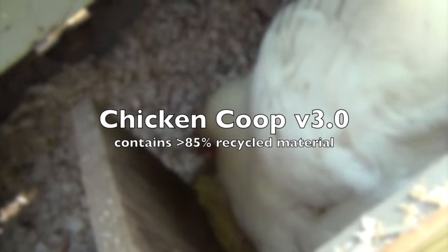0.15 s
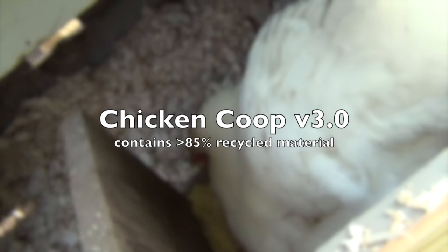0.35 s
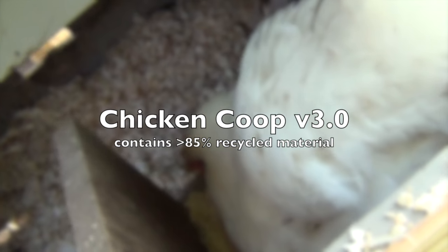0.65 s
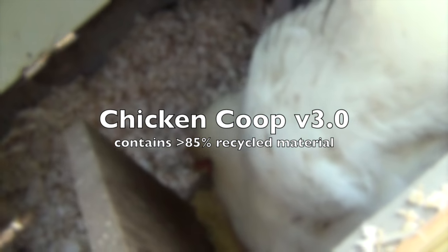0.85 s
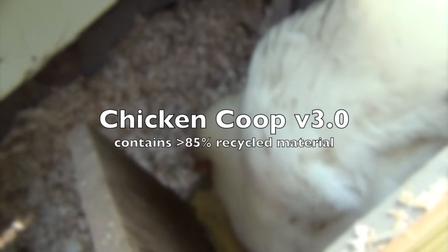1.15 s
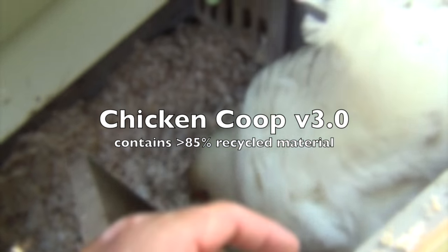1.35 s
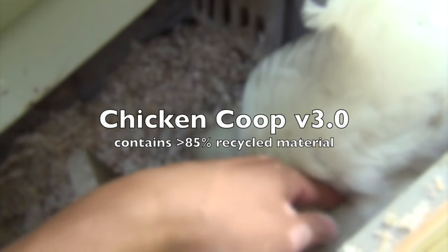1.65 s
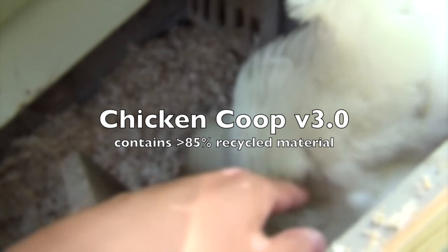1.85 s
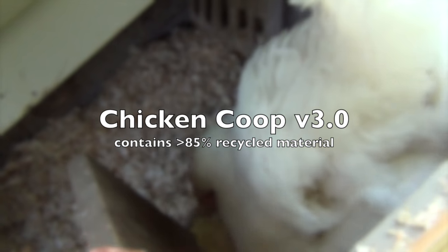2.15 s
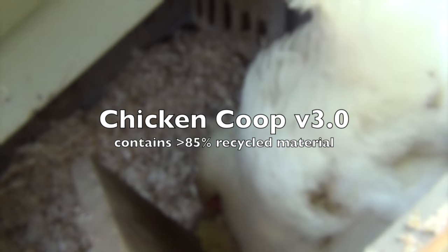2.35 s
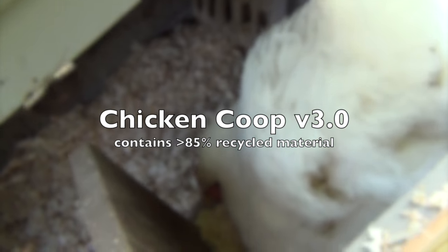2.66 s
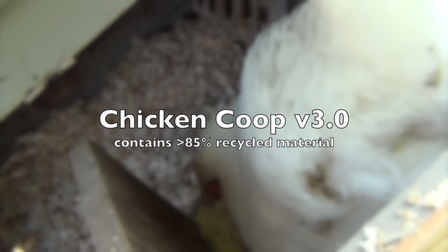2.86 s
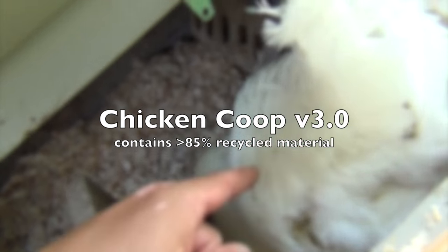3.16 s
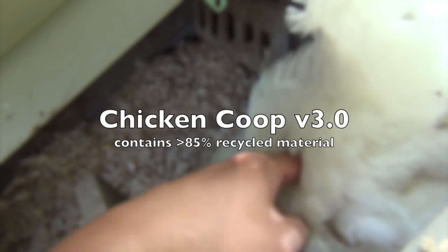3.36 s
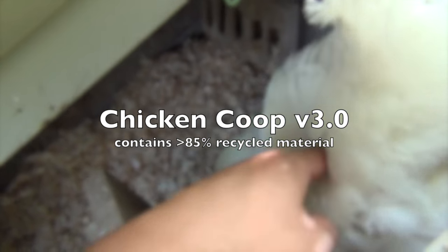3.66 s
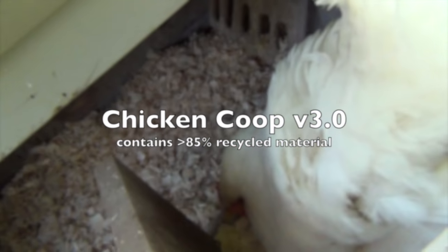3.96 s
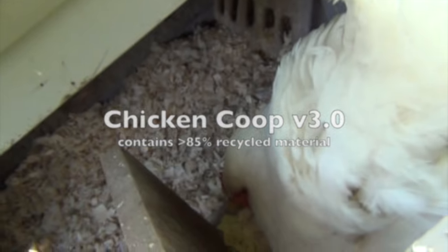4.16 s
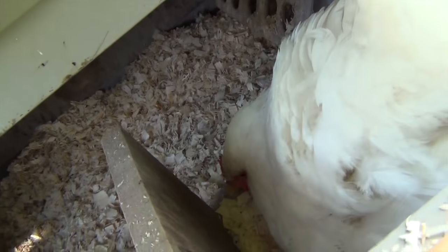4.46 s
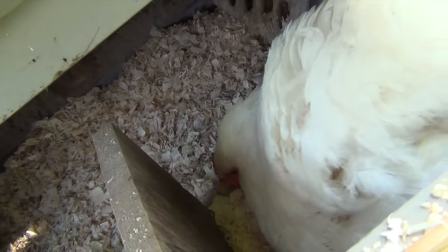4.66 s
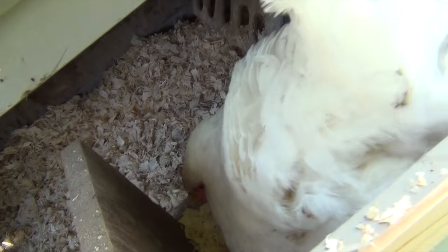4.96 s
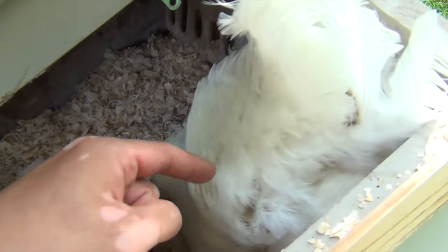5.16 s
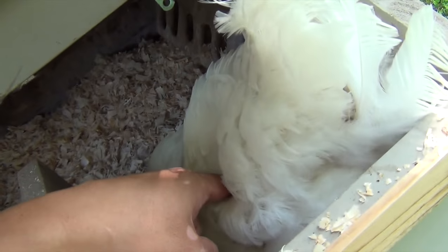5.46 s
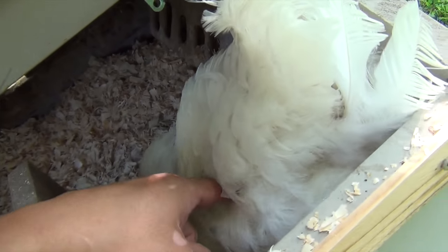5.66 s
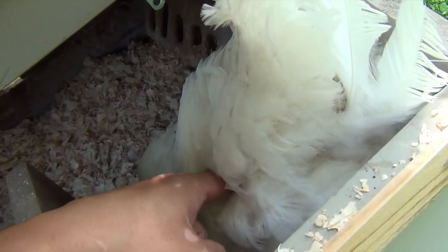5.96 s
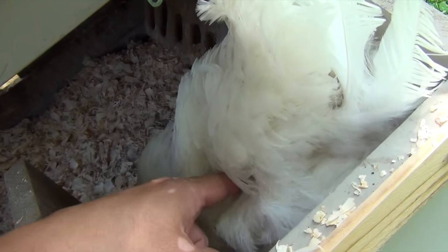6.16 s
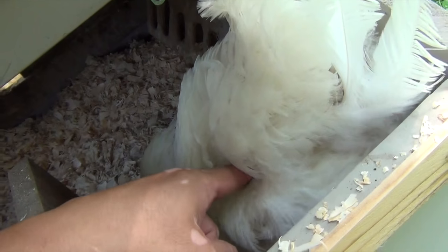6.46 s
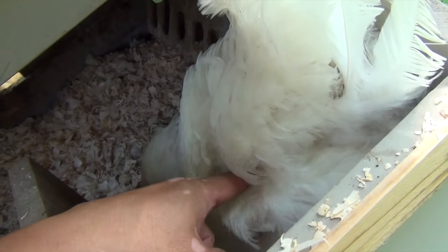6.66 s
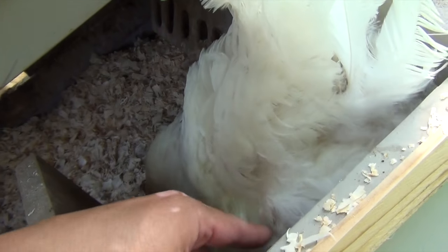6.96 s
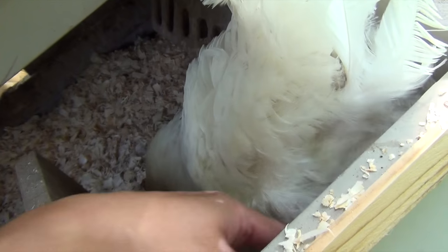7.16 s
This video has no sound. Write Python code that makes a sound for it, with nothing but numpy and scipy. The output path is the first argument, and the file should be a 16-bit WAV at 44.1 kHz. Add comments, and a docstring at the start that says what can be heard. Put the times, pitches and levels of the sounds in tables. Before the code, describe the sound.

Close low hen clucks and wooden knocks, broken by three rough fluttering squawks that sink in pitch, with small birds chirping far off outdoors.

```python
"""A wooden nesting box in a coop, outdoors and quiet: soft air, a low hum and a thin electronic whine throughout.
A sharp knock on the boards opens it, and a hen close to the microphone begins to cluck: syrinx pops and pulses.
Poked by a hand, she gives three harsh protests, at about 1.7, 3.5 and 5.6 s: fluttering, then rough and sinking.
More knocks, bursts of noise rung by wood, fall until about 5 s; far songbirds, gliding pure tones, sing between.
The clucks return after each protest and last to the end, over small ticks of beak and bedding."""
import sys
import numpy as np
from scipy import signal
from scipy.fft import rfft, irfft
from scipy.io import wavfile
from scipy.ndimage import uniform_filter1d

SR = 44100
rng = np.random.default_rng(int(sys.argv[2]) if len(sys.argv) > 2 else 0)


def file_out(sig):
    """Save sig as 16-bit WAV at sys.argv[1]."""
    # one column per channel
    cols = np.atleast_2d(sig).T
    # limit, then scale
    lim = np.clip(cols, -1, 1)
    pcm = np.round(lim * 32767).astype(np.int16)
    wavfile.write(sys.argv[1], SR, pcm)


N = 321841  # samples

# Spectrum of the outdoor air: pitch_hz [Hz], level_db [relative dB, per Hz]
AIR_SPECTRUM = [(15, -20), (25, -30.5), (179, 4), (368, -4), (644, -2.5), (735, -3), (840, -8.5), (959, -3),
                (1190, -2.5), (1920, -10), (3260, -12), (4040, -14), (4620, -12.5), (5860, -15),
                (14500, -25.5)]
AIR_DB, AIR_SWELL_DB = -58.5, 0.46  # mean level; rms of its slow swell
# Likeness of the air in the left and right channels: pitch_hz [Hz], likeness [correlation]
AIR_LIKENESS = [(60, 0.92), (150, 0.98), (380, 0.25), (950, 0.85), (2380, 0.086), (5980, 0.052),
                (15000, 0.79)]
# Low hum and electronic whine: pitch_hz [Hz], level_db [dB rms], width_hz [Hz, at half amplitude]
HUMS = [(60, -76, 3), (129, -91, 7.4), (15735, -70.5, 4), (15690, -75, 200)]

# Songbird whistles: start_s [s], length_s [s], first_hz [Hz], last_hz [Hz], level_db [dB peak, before wavering]
WHISTLES = [(.06, .05, 2290, 1820, -45), (1.215, .033, 4100, 3680, -66), (1.341, .11, 7720, 7210, -50.5),
            (1.382, .072, 4180, 3730, -62), (1.402, .037, 6200, 5330, -58.5),
            (1.599, .05, 4080, 3530, -60.5), (2.949, .06, 3400, 3230, -57.5), (2.976, .08, 2840, 2715, -52),
            (4.408, .043, 1867, 2510, -47), (4.476, .041, 3120, 3260, -59),
            (4.629, .058, 4500, 4520, -54.5), (4.748, .08, 4450, 4550, -57), (4.76, .028, 3080, 2920, -50),
            (4.823, .029, 1880, 2440, -48.5), (4.871, .057, 3346, 3190, -50),
            (4.957, 0.14, 3660, 3440, -62), (5.023, .094, 7750, 7460, -57), (5.053, .3, 3420, 3880, -65.5),
            (5.297, .36, 4160, 3840, -65.5), (5.335, .024, 3120, 2890, -53), (6.423, .036, 1950, 1614, -50)]
# Songbird warbles: start_s [s], length_s [s], pitch_hz [Hz], level_db [dB peak, before wavering],
# flick_height [share of pitch]
WARBLES = [(2.566, 0.19, 2360, -56.5, .19), (2.703, .18, 2570, -55.5, .18), (6.293, .056, 2290, -44, .34),
           (6.461, 0.089, 2408, -38.5, .5)]
WHISTLE_WAVER = 0.017  # rms share of pitch, whistles and warbles alike
FLICKS_PER_S, FLICK_SHARPNESS, FIRST_FLICK_S, WARBLE_DROOP = 52, 2.7, .022, 0.15  # droop: share of pitch

# Knocks on wood: start_s [s], crack_db [relative dB], ring_db [relative dB], rise_s [s],
# brightness [dB per octave], graze_db [dB against the blow]
KNOCKS = [(0.0238, -22.5, -16.5, 0.00033, 2.5, -9), (0.7289, -44, -34, .0006, -2.5, -22.5),
          (0.7559, -17, -24.5, 0.000076, -1, -12.5), (1.9174, -13.5, -19, .0002, 1, -36),
          (2.3382, -19.5, -28, .0002, -5, -30), (2.343, -29, -20.5, .0016, 5.5, -25),
          (3.348, -31.5, -20.5, 0.0075, 3, -5.5), (4.6126, -18.5, -20, 0.00053, 2.5, -28.5),
          (4.93, -33, -23, .012, 3, -14)]
# Spectrum of the first crack: pitch_hz [Hz], level_db [relative dB]
CRACK_SPECTRUM = [(80, -21), (400, 6), (900, 2.5), (1500, 4), (2400, 4.5), (3600, 0), (4800, -13),
                  (7000, -20), (9500, -41.5), (12000, -50.5), (16000, -59)]
# Spectrum of the ringing boards: pitch_hz [Hz], level_db [relative dB]
BOARD_SPECTRUM = [(50, -28.5), (130, 1.5), (250, -4), (420, 11), (650, 6.5), (1000, 2.5), (1600, -4.5),
                  (2800, -18), (4500, -23.5), (7000, -24), (10000, -38), (15000, -56)]
# Time for the boards to die by 60 dB: pitch_hz [Hz], t60_s [s]
BOARD_T60 = [(150, 0.37), (500, 0.17), (1200, 0.15), (3000, 0.16), (9000, 0.084)]
GRAZE_S = .0062  # the graze comes this long before the blow

# Time for the coop's reflections to die by 60 dB: pitch_hz [Hz], t60_s [s]
COOP_T60 = [(150, 0.88), (500, 0.08), (1000, 0.27), (3000, 0.4), (8000, 0.25)]
BOX_HZ, BOX_T60_S, BOX_DB = 666, .16, -12  # the hollow of the nesting box rings
HEN_GAINS_DB = [[1.25], [-1.4]]  # left and right: the hen and the reflections are a little louder on the left

# Clicks of beak and bedding: start_s [s], level_db [dB peak, before HEN_GAINS_DB], pitch_hz [Hz], width_hz [Hz]
TICKS = [(3.1335, -24.5, 5240, 1060), (3.1327, -37, 9600, 1500), (5.334, -27.5, 862, 278),
         (5.5537, -19, 831, 330), (6.123, -45, 7260, 1990)]

# Clucks, a pop, a weak hum and a creaky body: start_s [s], pop_db [dB, before HEN_GAINS_DB], body_delay_s [s],
# body_length_s [s], body_db [dB, before HEN_GAINS_DB], body_hz [Hz, where the body starts], edge_db [dB]
CLUCKS = [(0.1264, -22.5, .025, 0.012, -17, 247, -4.5), (0.5187, -18.5, 0.02, .012, -15.5, 308, -13),
          (0.92, -17.5, .013, 0.014, -18, 242.8, -17), (1.2979, -15.5, .016, 0.009, -17, 274, -16),
          (1.6283, -18.5, .02, 0.015, -12, 375.6, 5), (2.312, -19.5, 0.015, .014, -19, 294, 1),
          (2.7183, -18, 0.012, 0.0086, -16, 291, -4.5), (3.1333, -13, 0.017, 0.01, -18, 287, -1.5),
          (3.4282, -14.5, 0.016, .019, -16, 380.3, 5.5), (4.1041, -19.5, 0.017, 0.012, -13, 308.5, 2),
          (4.5786, -15, .016, 0.013, -17, 299, -1), (5.0102, -16.5, 0.011, 0.0127, -17, 334.6, 0),
          (5.2688, -13.5, .01, .015, -18.5, 285, 7.5), (6.1955, -15, .017, 0.011, -11.5, 307.3, 5.5),
          (6.5665, -13.5, 0.016, .011, -13.5, 275, 3.5), (6.965, -10.5, 0.014, 0.0097, -13, 347.4, 4.5),
          (7.2834, -16.5, 0.0052, 0.021, -6, 373, 8)]
# Windpipe with the beak nearly shut, for a cluck: pitch_hz [Hz], level_db [relative dB]
BEAK_SHUT = [(60, -42), (175, -14), (290, -12), (450, -5), (600, 1), (800, 3), (1080, -4), (1480, -24.5),
             (1780, -31.5), (2080, -29), (2600, -60), (3650, -60), (4250, -45.5), (4700, -55),
             (5250, -43.5), (5800, -68.5), (11000, -80.5)]
# Every pop has POP_HZ; a body at BODY_HZ falls by the share BODY_SAG, a lower one by more
POP_HZ, BODY_HZ, BODY_SAG = 415, 305, .17

# Protest calls: start_s [s], length_s [s], flutter_start_s [s], flutter_length_s [s], flutter_hz [Hz],
# opening_db, full_db, closing_db [dB, effort], edge_db [relative dB above 1.4 kHz, before a common 3.5 dB cut],
# three upper_db [relative dB of each upper resonance at the end of the call]
PROTESTS = [(1.715, 0.36, 1.729, 0.12, 570, -22, -14.5, -17.5, -15.5, -46.5, -41.5, -63),
            (3.498, 0.34, 3.544, .08, 490, -21.5, -13.5, -14, -16, -48.5, -42.5, -33.5),
            (5.574, .372, 5.623, .07, 611, -19.5, -14.5, -14.5, -19, -55, -58.5, -36)]
# Windpipe with the beak open, for a protest: pitch_hz [Hz], level_db [relative dB]
BEAK_OPEN = [(70, -44.5), (190, -20.5), (330, -15), (470, -5.5), (585, -7), (815, 1), (1130, -8.5),
             (1430, -24), (1800, -29.5), (2080, -32.5), (2500, -58.5), (3600, -59), (4300, -57.5),
             (6000, -67.5), (11000, -69.5)]
# Upper resonances, growing as the beak opens: pitch_hz [Hz], width_hz [Hz], rise_db [dB through the call]
UPPER_RESONANCES = [(2880, 170, 11.5), (4270, 280, 26.5), (5153, 270, 14)]
PROTEST_HZ, SINK, SINK_CURVE = 487, .38, 3.1  # loses this share of pitch, ever faster, as the air runs out
FLUTTERS_PER_S, FLUTTER_JITTER, FLUTTER_OCTAVES = 62, .06, 1.05
FLUTTER_IN_S, FLUTTER_OUT_S = .015, .045
TREMBLE_OCTAVES, FLUTTER_UNEVEN = .13, .18  # a trace of flutter stays to the end; its depth varies
ATTACK_S, FULL_AT, CLOSE_S = .008, 0.56, 0.05  # full effort comes at this share of the call
ROUGH_START, ROUGH_SETTLED, SETTLE_S = .52, .32, .06
EDGE_RISE_DB, UPPER_CHOKE_DB = 9, -5  # the edge grows; fluttering dulls the upper resonances
UPPER_FLICKER_DB, UPPER_FLICKER_HZ = 3.5, 45  # each upper resonance flares and fades on its own

EDGE_HZ = 16000  # upper band limit of the recorder


def gain_of(db):
    """Decibels to gain."""
    return 10 ** (np.asarray(db) / 20)


def evened(x):
    """Scales to rms 1."""
    return x / np.sqrt(np.mean(x ** 2) + 1e-20)


def ramp(x):
    """Rises from 0 to 1 and stays there."""
    return np.clip(x, 0, 1)


def read(points, hz):
    """Reads a table on a log-frequency axis."""
    f, value = np.transpose(points)
    return np.interp(np.log(hz + 1), np.log(f + 1), value)


def bell(f, centre_hz, width_hz):
    """Resonance curve in dB, 12 dB down at width_hz from its centre."""
    return -40 * np.log10(1 + ((f - centre_hz) / width_hz) ** 2)


def add(mix, s, sound):
    """Mixes a sound in at time s."""
    part = mix[..., max(round(s * SR), 0):][..., :sound.shape[-1]]
    part += sound[..., :part.shape[-1]]


def track(sounds, channels=1):
    """Lays timed sounds on one track."""
    out = np.zeros((channels, N))
    for s, sound in sounds:
        add(out, s, sound)
    return out


def wander(n, hz):
    """Random motion of rms about 1, with little faster than hz."""
    size = n + SR // 8
    f = np.fft.rfftfreq(size, 1 / SR)
    slow = rfft(rng.standard_normal(size)) / np.sqrt(1 + (f / hz) ** 8)
    return evened(irfft(slow))[:n]


def colour(x, curve_db):
    """Causal minimum-phase filter with the gain curve_db(Hz); the result has room to ring out."""
    size = 2048
    log_gain = np.log(gain_of(curve_db(abs(np.fft.fftfreq(size, 1 / SR)))))
    ring = np.fft.ifft(np.exp(np.conj(signal.hilbert(log_gain)))).real[:size // 2]
    return signal.fftconvolve(x, ring * np.hanning(size)[size // 2:])


def swing(x, size):
    """Running rms over about size samples."""
    power = uniform_filter1d(uniform_filter1d(x ** 2, size), size)
    return np.sqrt(abs(power) + 1e-12)


def dying(t60, length):
    """Two channels of dense reflections, each band dying at its own speed."""
    hz, t, z = signal.stft(rng.standard_normal((2, int(length * SR))), SR, nperseg=128)
    decay = gain_of(-60 * t / read(t60, hz)[:, None])
    tail = signal.istft(z * decay, SR, nperseg=128)[1]
    return tail / np.linalg.norm(tail, axis=1, keepdims=True)


def echo(x, t60, wet_db, delay, spread):
    """Reflections that arrive after a delay, partly unlike in the two channels."""
    mid, side = dying(t60, 0.19)
    tail = np.array([mid + spread * side, mid - spread * side])
    return track([(delay, gain_of(wet_db) * signal.fftconvolve(x, tail, axes=1))], channels=2)


def air():
    """Outdoor wash of shaped noise that swells a little, with narrow noise bands for the hum and whine."""
    f = np.fft.rfftfreq(N, 1 / SR)
    a, b, c = rfft(rng.standard_normal((3, N)))
    same = np.clip(read(AIR_LIKENESS, f), -1, 1)
    mid, side = a * np.sqrt(1 + same), b * np.sqrt(1 - same)
    wash = irfft(np.array([mid + side, mid - side]) * gain_of(read(AIR_SPECTRUM, f)), N)
    hum = 0
    for hz, db, width in HUMS:
        band = c / (1 + (2 * (f - hz) / width) ** 2)
        hum = hum + gain_of(db) * evened(irfft(band, N))
    return gain_of(AIR_DB + AIR_SWELL_DB * wander(N, 1.0)) * evened(wash) + hum


def note(hz, db):
    """A bird's pure tone along a pitch curve, wavering a little in pitch and level."""
    n = len(hz)
    turns = np.cumsum(hz * (1 + WHISTLE_WAVER * wander(n, 120))) / SR
    return gain_of(db + 2 * wander(n, 40)) * np.sin(2 * np.pi * turns) * signal.windows.tukey(n, .5)


def whistle(row):
    """A far bird's voice glides once from one pitch to another."""
    s, length, first_hz, last_hz, db = row
    return s, note(np.geomspace(first_hz, last_hz, int(length * SR)), db)


def warble(row):
    """The pitch flicks up in sharp peaks, highest in the middle of the note, and droops at the end."""
    s, length, hz, db, height = row
    t = np.arange(int(length * SR)) / SR
    flicks = np.exp(-FLICK_SHARPNESS * abs(np.sin(np.pi * FLICKS_PER_S * (t - FIRST_FLICK_S))) / 2)
    droop = 1 - WARBLE_DROOP * (t / length) ** 2
    return s, note(hz * droop * (1 + height * flicks * np.sin(np.pi * t / length)), db)


def knock(row, crack_decay=0.03, width=0.32):
    """A blow gives a short crack of noise and the ring of the boards, dying band by band."""
    s, crack_db, ring_db, rise, tilt_db = row
    ring = dying(BOARD_T60, .3)
    t = np.arange(ring.shape[1]) / SR
    swell = 1 - np.exp(-t / max(rise, 1e-4))
    # a softer rise also makes a longer crack
    crack = rng.standard_normal(ring.shape) * gain_of(-60 * t / (crack_decay + 5 * rise))
    out = 0
    for burst, spectrum, db in ((crack, CRACK_SPECTRUM, crack_db), (ring, BOARD_SPECTRUM, ring_db)):
        mid, side = (colour(b * swell, lambda f: read(spectrum, f) + tilt_db * np.log2(f + 300)) for b in burst)
        stereo = np.array([mid + width * side, mid - width * side])
        out = out + gain_of(db) * stereo / np.linalg.norm(mid)
    return s, out * np.sqrt(SR / 200)  # levels refer to 5 ms of energy


def blows():
    """Each knock grazes the wood just before it lands."""
    for s, crack_db, ring_db, rise, tilt_db, graze_db in KNOCKS:
        yield knock((s - GRAZE_S, crack_db + graze_db, ring_db + graze_db, rise, tilt_db))
        yield knock((s, crack_db, ring_db, rise, tilt_db))


def click(row, t60=0.022):
    """A tick of beak or bedding: a brief noise burst in one resonant band."""
    s, db, hz, width = row
    t = np.arange(SR // 30) / SR
    burst = rng.standard_normal(len(t)) * gain_of(-60 * t / t60)
    tick = colour(burst, lambda f: bell(f, hz, width))
    return s, gain_of(db) * tick / abs(tick).max()


def pulses(turns, hz):
    """One sharp puff each turn: 47 harmonics in step, faded out between 8 and 9 kHz."""
    k = np.arange(1, 48)[:, None]
    return (np.cos(2 * np.pi * k * turns) * np.clip((9000 - k * hz) / 1000, 0, 1)).sum(0)


def throat(x, edge_db):
    """The hen's resonances with her beak nearly shut; a harder push lifts the upper ones."""
    push = [(1100, 0.077), (2000, 0.75), (5000, 2.1)]  # pitch_hz, multiple of edge_db
    return colour(x, lambda f: read(BEAK_SHUT, f) + edge_db * read(push, f))


def cluck(row, pop_length=.0058, hum_db=-10, breath=.12, jitter=0.034):
    """The syrinx pops open, hums weakly, then beats a few slowing pulses and shuts."""
    s, pop_db, delay, length, body_db, body_hz, edge_db = row
    out = np.zeros(SR // 8)
    body_end_hz = body_hz * (1 - min(BODY_SAG * (BODY_HZ / body_hz) ** 2, .5))
    hum_length = max(delay - pop_length, .002)
    parts = [(0, pop_length, pop_db, POP_HZ, POP_HZ),
             (pop_length, hum_length, pop_db + hum_db, POP_HZ, body_hz),
             (delay, length, body_db, body_hz, body_end_hz)]
    for start, span, db, first_hz, last_hz in parts:
        hz = np.geomspace(first_hz, last_hz, int(span * SR))
        n = len(hz)
        turns = np.cumsum(hz) / SR - .15 + jitter * wander(n, hz=250)
        swell = np.interp(np.linspace(0, 1, n), [0, .5, 1], [.6, 1, .85]) * signal.windows.tukey(n, .05)
        drive = evened(pulses(turns, hz)) * (1 + .2 * wander(n, 300))
        drive = drive + breath * rng.standard_normal(n)
        voice = throat(drive * swell, edge_db)
        add(out, start, gain_of(db) * voice * np.sqrt(n) / np.linalg.norm(voice))
    return s, out


def squawk(row, shimmer=2.2, hiss=0.18):
    """A protest that starts as a fast flutter of falling sweeps and settles into a rough, sinking tone."""
    s, length, flutter_s, flutter_length, flutter_hz, opening_db, full_db, closing_db, edge_db, *upper_db = row
    t = np.arange(0, length, 1 / SR)
    n, gone, since = len(t), t / length, s + t - flutter_s
    # one push of air: the effort swells, holds and closes while the pitch sinks and the beak opens
    effort_db = opening_db + (full_db - opening_db) * ramp(gone / FULL_AT)
    effort_db = effort_db + (closing_db - full_db) * ramp(1 + (t - length) / CLOSE_S)
    flutter = ramp(1 + since / FLUTTER_IN_S) * ramp(1 - (since - flutter_length) / FLUTTER_OUT_S)
    hz = PROTEST_HZ * (1 - SINK * gone ** SINK_CURVE) * (1 - flutter) + flutter_hz * flutter
    depth = FLUTTER_OCTAVES * flutter + TREMBLE_OCTAVES * (1 - flutter)
    depth = depth * (1 + FLUTTER_UNEVEN * wander(n, hz=30))
    rough = ROUGH_SETTLED + (ROUGH_START - ROUGH_SETTLED) * np.exp(-t / SETTLE_S)
    edge_db = edge_db - EDGE_RISE_DB * (1 - gone)
    # each flutter chokes the flow while it throws the pitch up, then sounds as the pitch slides back
    beats = np.cumsum(FLUTTERS_PER_S * (1 + FLUTTER_JITTER * wander(n, hz=37.4))) / SR
    beat = np.pi + 2 * np.pi * (beats - np.interp(0, since, beats))
    lift = depth * (.5 + .5 * np.sin(beat + .6 * np.sin(beat)))  # octaves
    flow = np.exp(-.65 * depth * np.cos(beat - .1))
    hz = hz * 2 ** (lift + .22 * rough * wander(n, 80))
    # uneven membranes: pulses come early or late, strong or weak
    turns = np.cumsum(hz) / SR + .23 * rough * wander(n, 250)
    drive = evened(pulses(turns, hz)) * np.exp(shimmer * rough * np.tanh(wander(n, 220)))
    # breath hisses strongest at the start of each pulse
    drive += hiss * rough * evened(np.exp(-(turns % 1) / .25) * rng.standard_normal(n))
    voice = colour(drive, lambda f: read(BEAK_OPEN, f))[:n]
    for (top_hz, width, rise_db), db in zip(UPPER_RESONANCES, upper_db):
        flicker_db = UPPER_FLICKER_DB * wander(n, UPPER_FLICKER_HZ)
        gape = gain_of(db - rise_db * (1 - gone) + UPPER_CHOKE_DB * flutter + flicker_db)
        voice += gape * colour(drive, lambda f: bell(f, top_hz, width))[:n]
    # the membranes can swing only so far, so the strongest pulses are held back
    voice = voice * flow / np.hypot(swing(voice, size=70), swing(voice, size=720))
    # the whole flow stumbles irregularly, which gives the rattle
    voice *= np.exp(.65 * rough * np.tanh(wander(n, 110)))
    voice = signal.sosfilt(signal.butter(2, 130, "high", fs=SR, output="sos"), voice)
    # the edge above 1.4 kHz is levelled apart from the body, grows with the push and flickers
    edge = signal.sosfiltfilt(signal.butter(6, 1400, "high", fs=SR, output="sos"), voice)
    body, edge = (x / swing(x, size=720) for x in (voice - edge, edge))
    edge *= gain_of(2.5 * np.tanh(wander(n, 100)))
    call = gain_of(effort_db) * (body + gain_of(edge_db - 3.5) * edge)
    return s, call * ramp(t / ATTACK_S) * signal.windows.tukey(n, .02)


def hollow_of(hen):
    """The hollow of the nesting box rings at one pitch."""
    q = BOX_HZ * BOX_T60_S * np.pi / np.log(1000)
    return gain_of(BOX_DB) * signal.lfilter(*signal.iirpeak(BOX_HZ, q, SR), hen)


def scene():
    """The hen close by in her box, knocks around the coop, birds beyond."""
    birds = track([whistle(r) for r in WHISTLES] + [warble(r) for r in WARBLES])
    knocks = track(blows(), channels=2)
    hen = track([click(r) for r in TICKS] + [cluck(r) for r in CLUCKS] + [squawk(r) for r in PROTESTS])
    yard = echo(birds, [(2000, 0.27), (8000, .28)], wet_db=-5.5, delay=0.0048, spread=.75)
    coop = echo(hen + knocks[:1], COOP_T60, wet_db=-22.5, delay=.014, spread=0.51)
    box_t60 = [(180, 0.2), (400, 0.099), (1000, 0.059), (5000, 0.078)]  # pitch_hz, t60_s
    box = echo(hen, box_t60, wet_db=-13.0, delay=0.003522, spread=0.23)
    close = (hen + hollow_of(hen) + box + coop) * gain_of(HEN_GAINS_DB)
    return air() + birds + yard + knocks + close


def record(dry):
    """The recorder's upper band limit, after a 2 ms fade at the end."""
    soft = dry * ramp(np.arange(N)[::-1] / (.002 * SR))
    low_pass = signal.firwin(1023, EDGE_HZ, window=("kaiser", 9), fs=SR)
    return signal.oaconvolve(soft, low_pass[None], "same")


dry = scene()
out = record(dry)
file_out(out)
```